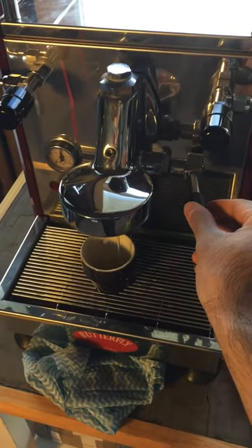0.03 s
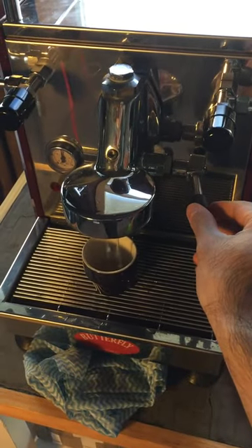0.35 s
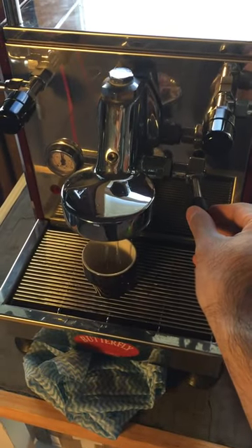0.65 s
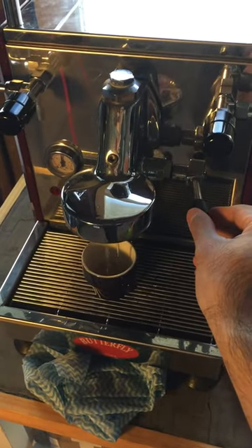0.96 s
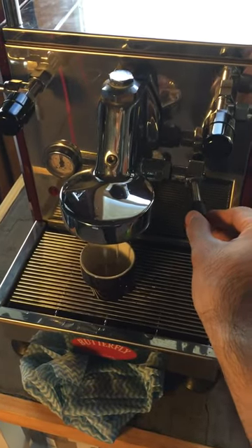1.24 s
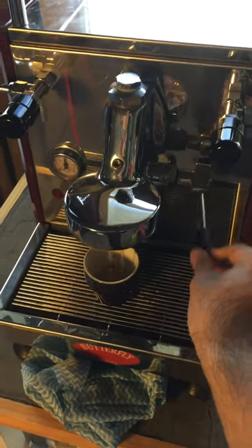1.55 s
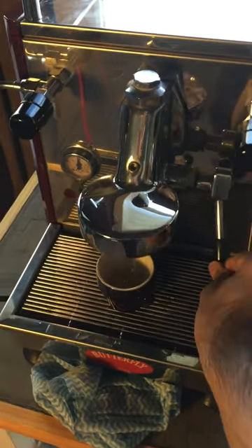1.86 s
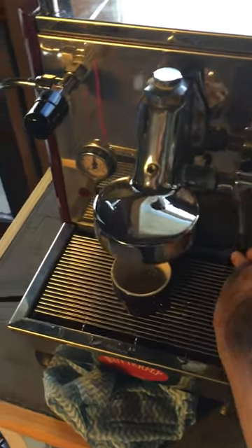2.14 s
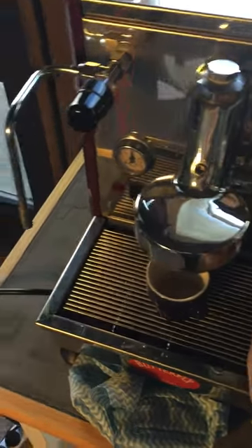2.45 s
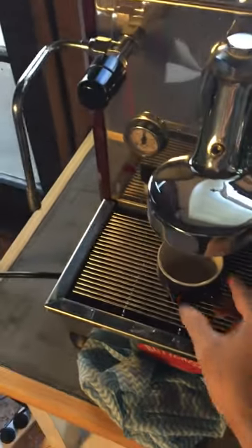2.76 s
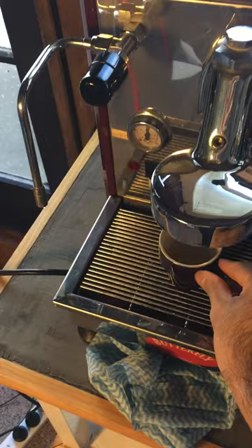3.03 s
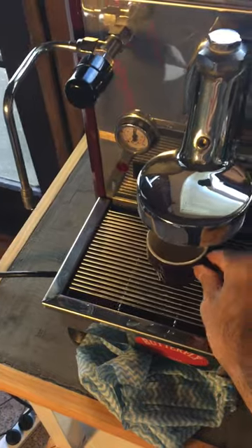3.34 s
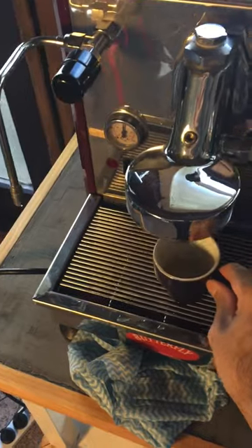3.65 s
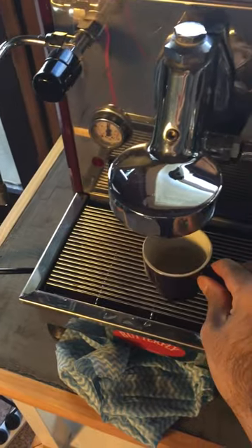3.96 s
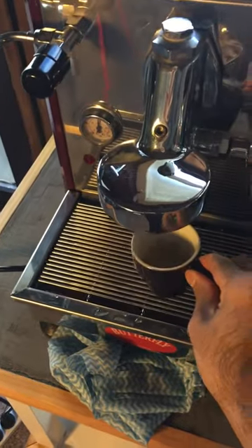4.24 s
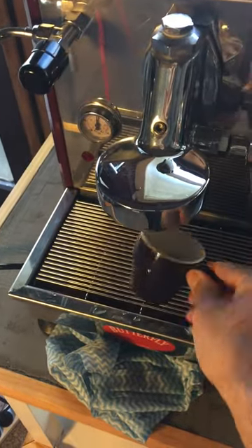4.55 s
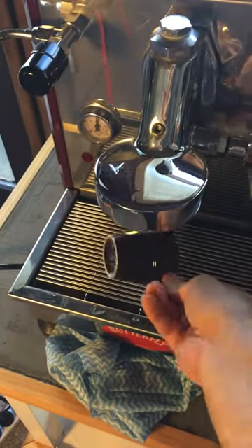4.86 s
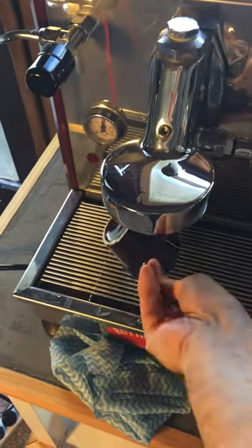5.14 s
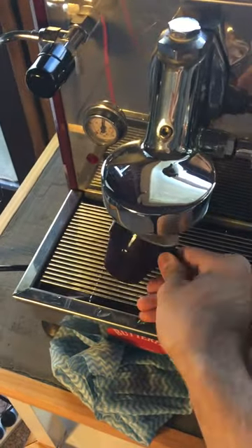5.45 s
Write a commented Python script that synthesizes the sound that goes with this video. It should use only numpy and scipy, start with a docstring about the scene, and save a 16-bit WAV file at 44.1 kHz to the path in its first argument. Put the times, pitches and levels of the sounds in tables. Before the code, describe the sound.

An espresso machine pump buzzes and rattles as water splutters into a cup, then stops, leaving light cup scrapes and clinks.

```python
"""A lever espresso machine's pump drives hot rinse water into a cup in a small kitchen.
The motor drones through the casing; two strokes a turn sound the valve, rattle the panels and spurt
hissing water, which splutters into the cup until the lever shuts the pump off. The boiler keeps a thin
leak whistle and a low rumble. The cup sticks and slips over the drip tray's steel grille, then is
tipped out with light clinks."""
import sys
import numpy as np
from scipy import signal
from scipy.fft import rfft, irfft
from scipy.io import wavfile
from scipy.ndimage import uniform_filter1d

SR = 44100
rng = np.random.default_rng(int(sys.argv[2]) if len(sys.argv) > 2 else 0)


def inscribe(sig):
    """Save sig as 16-bit PCM at rate SR to the path in sys.argv[1].

    A 1-D sig is mono; a 2-D sig holds one channel per row.
    Samples are clipped to [-1, 1] before scaling.
    """
    pcm = np.round(np.clip(np.atleast_2d(sig).T, -1, 1) * 32767)
    wavfile.write(sys.argv[1], SR, pcm.astype(np.int16))


N = 251370

TIME = np.arange(N) / SR
MOTOR_HZ, PUMP_STOP_S = 25.012, 1.787

# Gritty contact on steel. Each row: frequency in Hz, spectral density in dB.
GRIT_SPECTRUM = [(400, 2), (800, 1), (1500, 21.5), (1900, 8), (2500, 8.5), (3300, 14.5), (4000, 3.5),
                 (4700, 5.5), (5900, 8), (7000, -4), (8200, 1.5), (11000, -8.5), (15000, -4)]


def from_db(db):
    """Decibels to gain."""
    return 10 ** (np.asarray(db) / 20)


def rms_one(x):
    """Scale to rms 1."""
    return x / np.sqrt(np.mean(x ** 2) + 1e-20)


def rms_one_pumping(x):
    """Scale to rms 1 over the pump's run."""
    return x / np.sqrt(np.mean(x[TIME < PUMP_STOP_S] ** 2))


def evened(x, window_samples):
    """Hold the slow level at rms 1, keep the quick flutter."""
    return x / np.sqrt(uniform_filter1d(x ** 2, size=window_samples) + 1e-9)


def coloured(x, spectrum):
    """Shape x by (Hz, dB) points, rolled off past both ends; rms 1."""
    hz, db = np.transpose(spectrum)
    bins_hz = np.maximum(np.fft.rfftfreq(N, 1 / SR), 1)
    gain = from_db(np.interp(np.log(bins_hz), np.log(hz), db))
    skirts = np.minimum(bins_hz / hz[0], 1) ** 2 * np.minimum(hz[-1] / bins_hz, 1) ** 2
    return rms_one(irfft(rfft(x) * gain * skirts, N))


def drift(rate_hz):
    """Random wander; rms 1."""
    knots = rng.standard_normal(int(rate_hz * N / SR) + 2)
    return rms_one(np.interp(TIME * rate_hz, np.arange(len(knots)), knots))


def grains(per_s, spread_db):
    """Random impulses of uneven size; rms 1."""
    sizes = from_db(spread_db * np.minimum(rng.exponential(1, N), 4)) * rng.choice([-1, 1], N)
    return rms_one(sizes * (rng.random(N) < per_s / SR))


def resonate(x, hz, width_hz):
    """One resonance, peak gain 1."""
    r = np.exp(-np.pi * width_hz / SR)
    feedback = [1, -2 * r * np.cos(2 * np.pi * hz / SR), r * r]
    return signal.lfilter(np.array([1, 0, -1]) * (1 - r * r) / 2, feedback, x + 1e-18)


def body(x, modes):
    """Parallel resonances, signs alternating."""
    return sum((-1) ** k * from_db(db) * resonate(x, hz, width_hz)
               for k, (hz, width_hz, db) in enumerate(modes))


def narrow_noise(hz, width_hz):
    """Noise in a steep-skirted resonance; rms 1."""
    return rms_one(resonate(resonate(rng.standard_normal(N), hz, width_hz), hz, width_hz))


def add_at_peak(out, start_s, peak_db, sound):
    """Mix in a short sound at a given peak level."""
    at = int(start_s * SR)
    scaled = from_db(peak_db) * sound / np.abs(sound).max()
    out[at:at + len(sound)] += scaled[:max(N - at, 0)]


def swell(start_s, rise_s, hold_s, fall_db_per_s):
    """Envelope: rise, hold, steady fall in dB."""
    since_s = TIME - start_s
    rise = np.clip(since_s / rise_s, 0, 1) ** 1.26
    return rise * from_db(-fall_db_per_s * np.clip(since_s - rise_s - hold_s, 0, 2))


def run_down(db_per_s):
    """Envelope: full until the pump stops, then a steady fall in dB."""
    return from_db(-db_per_s * np.clip(TIME - PUMP_STOP_S, 0, 1))


def strokes(first_s, uneven_db, jitter_s):
    """Two strokes a turn until the stop: seconds from the nearest stroke, and its strength."""
    period_s = 1 / (2 * MOTOR_HZ)
    index = np.round((TIME - first_s) / period_s).astype(int)
    chance = rng.standard_normal((index[-1] + 2, 2))[index]
    stroke_s = first_s + index * period_s
    strength = from_db(uneven_db * chance[:, 1]) * (stroke_s < PUMP_STOP_S)
    return TIME - stroke_s + jitter_s * chance[:, 0], strength


def motor_drone(level_db, waver, shudder, fall_db_per_s, panel_hz, panel_fall_db_per_s):
    """The motor shakes the casing; once off, it shudders out and a panel's note lingers."""
    # Each row: multiple of the turn rate, relative level in dB.
    motor_orders = [(3, -29), (4, -9), (6, -9), (7, 0), (8, -9), (9, -17), (10, -4), (11, -18), (12, -11),
                    (13, -23), (14, -18), (15, -17), (16, -20), (17, -18), (18, -16), (20, -14), (22, -15),
                    (26, -17), (28, -16), (29, -22), (31, -19), (32, -19), (34, -21), (37, -21), (38, -13)]
    out = np.zeros(N)
    coasting = np.clip((TIME - PUMP_STOP_S) / 0.051, 0, 1)
    for order, db in motor_orders:
        hz = order * MOTOR_HZ
        near_panel = np.exp(-(np.log(hz / panel_hz) / .25) ** 2)
        dying = run_down(fall_db_per_s + near_panel * (panel_fall_db_per_s - fall_db_per_s))
        unsteady = waver * np.sqrt(order) + shudder * coasting
        phase = 2 * np.pi * (hz * TIME + rng.random()) + unsteady * drift(24.9)
        tone = (1 + unsteady * drift(25.02)) * np.sin(phase)
        out += from_db(db + level_db - 1.1 * coasting) * tone * dying
    return out


def valve_song(level_db, pitch_hz, swell_s):
    """Each pressure stroke swells a short tone in the valve."""
    since_s, strength = strokes(first_s=.0133, uneven_db=.9, jitter_s=.00005)
    tone = strength * np.exp(-.5 * (since_s / swell_s) ** 2) * np.cos(2 * np.pi * pitch_hz * since_s)
    return from_db(level_db) * rms_one_pumping(tone)


def panel_rattle(level_db, growth_db_per_s, pattern_gain, force_floor, knock_s):
    """Loose panels chatter on every stroke; the bright part nearly repeats."""
    # Each row: frequency in Hz, spectral density in dB.
    panel_spectrum = [(45, -16.5), (130, -11.5), (280, -4), (400, 2), (560, 3.5), (640, -11), (850, -3),
                      (1050, -4), (1230, 0.5), (1750, 0.5), (2300, -9.5), (2900, -12.5), (3600, -17),
                      (4400, -24)]
    since_s, strength = strokes(first_s=0.0092, uneven_db=1.0, jitter_s=0.00017)
    one_stroke = rng.standard_normal(round(SR / MOTOR_HZ / 2))
    stroke_phase = TIME * 2 * MOTOR_HZ % 1
    looped = one_stroke[(stroke_phase * len(one_stroke)).astype(int)]
    pattern = signal.sosfilt(signal.butter(4, 1400, "high", fs=SR, output="sos"), looped)
    contacts = pattern_gain * pattern + grains(per_s=4000, spread_db=2)
    force = force_floor + strength * np.exp(-.5 * (since_s / knock_s) ** 2)
    panels = coloured(contacts * force, panel_spectrum) * run_down(db_per_s=157)
    return from_db(level_db + growth_db_per_s * TIME) * rms_one_pumping(panels)


def water_hiss(level_db, ease_db_per_s, flow_floor, rise_s, fade_s, pipework_db):
    """Water spurts through the valve at every stroke and rings the steel pipework."""
    # Each row: frequency in Hz, spectral density in dB.
    jet_spectrum = [(1500, -21), (3000, -18), (4200, -16), (5000, -8), (6500, 1), (7800, -1), (8600, 1.5),
                    (9700, -1), (10600, -6.5), (13000, -4), (16000, -4)]
    # Each row: frequency in Hz, width in Hz, gain in dB.
    pipework_modes = [(3457, 14, 14.5), (3670, 68, 10), (6470, 240, -13), (7620, 17, 7), (8350, 75, -5),
                      (9650, 65, -11), (13000, 150, -18), (14900, 170, 3), (15500, 110, -8)]
    since_s, strength = strokes(first_s=0.011, uneven_db=0.0, jitter_s=0.00023)
    spurt = strength * np.exp(np.minimum(since_s / rise_s, -since_s / fade_s))
    flow = np.hypot(flow_floor, spurt)
    jet = flow * (grains(per_s=7000, spread_db=4.5) + 1.8 * rng.standard_normal(N))
    jet += 0.073 * grains(per_s=160, spread_db=17.5)   # stray spits
    for hz in np.geomspace(3000, 15000, num=7):   # each spurt gets its own colour
        jet += (from_db(2.0 * drift(50.24)) - 1) * resonate(jet, hz, hz / 5)
    pipework = from_db(pipework_db) * rms_one(body(jet, pipework_modes))
    hiss = (coloured(jet, jet_spectrum) + pipework) * run_down(db_per_s=780)
    return from_db(level_db - ease_db_per_s * TIME) * rms_one_pumping(hiss)


def boiler(flutter_db, surge_db, puff_s):
    """A faint leak whistles unsteadily over a low, surging rumble."""
    # Each row: time in seconds, whistle level in dB, rumble level in dB.
    simmer_levels = [(1.9, -58, -61.5), (2.7, -60.5, -56), (3.1, -59.5, -57.5), (3.65, -58.5, -56.5),
                     (4.05, -61, -66), (5.7, -61, -69)]
    # Each row: frequency in Hz, width in Hz, relative level in dB.
    whistle_modes = [(960, 8.5, -18), (1271, 41, 2.5), (1368, 10, -9), (1752, 41, -16), (1942, 37, -13.5),
                     (2666, 11, -20), (2790, 11, -24)]
    # Spurts of the leak. Each row: time in seconds, whistle level in dB.
    leak_puffs = [(2.585, -58), (5.35, -54)]
    times_s, whistle_db, rumble_db = np.transpose(simmer_levels)
    whistle = sum(from_db(db) * narrow_noise(hz, width_hz) for hz, width_hz, db in whistle_modes)
    puffs = sum(from_db(db) * np.exp(-.5 * ((TIME - at_s) / puff_s) ** 2) for at_s, db in leak_puffs)
    leak = from_db(np.interp(TIME, times_s, whistle_db) + flutter_db * drift(14))
    rumble = narrow_noise(hz=71, width_hz=18.6)
    surge = from_db(np.interp(TIME, times_s, rumble_db) + surge_db * drift(9))
    return np.hypot(leak, puffs) * evened(whistle, 4000) + surge * evened(rumble, 4000)


def kitchen_air(level_db):
    """Steady, bass-heavy room noise."""
    # Each row: frequency in Hz, spectral density in dB.
    air_spectrum = [(25, -14), (50, 4), (110, 5.5), (150, 2.5), (250, 0.5), (400, -5), (600, -10.5),
                    (1200, -8), (2000, -9.5), (3500, -13.5), (4900, -18), (6700, -17), (10500, -25),
                    (16000, -25.5)]
    return from_db(level_db) * coloured(rng.standard_normal(N), air_spectrum)


def splashes(swell_s, width_ratio, small_count, small_db, low_hz, high_hz):
    """Gobs of water hit the cup, each a cluster of bubbles near one pitch; small ones fall at random."""
    # Each row: start in seconds, peak in dB, pitch in Hz.
    large_gobs = [(.168, -29, 1750), (.209, -23.5, 1230), (.308, -27.5, 1710), (.378, -32.5, 646),
                  (.446, -31, 840), (.617, -34.5, 2900), (.731, -28, 770), (.74, -34.5, 3400),
                  (0.963, -27, 1510), (.991, -30.5, 2950), (1.234, -24.5, 1470), (1.533, -27.5, 1640),
                  (1.659, -27, 1910)]
    small_gobs = [(when * PUMP_STOP_S, small_db, low_hz * (high_hz / low_hz) ** pitch)
                  for when, pitch in rng.random((small_count, 2))]
    out, t = np.zeros(N), TIME[:SR // 15]
    for start_s, peak_db, hz in large_gobs + small_gobs:
        burst = rng.standard_normal(len(t)) * t * np.exp(-t / swell_s)
        plop = resonate(burst, hz, hz * width_ratio)
        add_at_peak(out, start_s, peak_db, resonate(plop, hz, hz / 2))
    return out


def spout_spits(burst_s):
    """Air caught in the water bursts out in short bright ticks."""
    # Each row: start in seconds, peak in dB.
    spit_events = [(0.742, -32), (0.846, -35), (1.161, -33), (1.3334, -27), (1.7642, -25.5)]
    out, t = np.zeros(N), TIME[:SR // 100]
    for start_s, peak_db in spit_events:
        burst = rng.standard_normal(len(t)) * np.exp(-t / burst_s)
        add_at_peak(out, start_s, peak_db, resonate(burst, hz=10800, width_hz=9000))
    return out


def lever_and_cup_clicks(contact_s, width_hz, cup_gain):
    """Brief rough contacts, each a note and a bright crack; the cup rings along."""
    # Each row: start in seconds, peak in dB, pitch in Hz, crack relative to the note in dB.
    click_events = [(1.802, -36, 2870, -26), (1.89, -35.5, 2010, -11.5), (3.1014, -33.5, 3030, -35),
                    (3.4563, -49, 4560, -23), (3.55, -39.5, 3300, -24), (4.875, -45, 2780, -26),
                    (4.8893, -43, 3060, -18), (4.8945, -38.5, 6860, -30), (4.936, -41.5, 6200, -4),
                    (4.971, -47, 2910, -7), (5.0023, -46, 2040, -7), (5.021, -51, 3740, -17),
                    (5.0375, -36, 3340, -7), (5.0443, -34.5, 3940, -24), (5.055, -40.5, 6280, -27),
                    (5.1168, -48, 2700, -30), (5.18, -47, 4300, -12)]
    # Each row: frequency in Hz, width in Hz, gain in dB.
    cup_modes = [(2798, 20, 5), (3350, 8.9, 2), (4100, 49, -16), (4120, 23, -24), (4440, 110, -9),
                 (6240, 33, -8)]
    out, t = np.zeros(N), TIME[:SR // 15]
    for start_s, peak_db, hz, crack_db in click_events:
        contact = rng.standard_normal(len(t)) * np.exp(-t / contact_s)
        ringing = resonate(contact, hz, width_hz) + cup_gain * body(contact, cup_modes)
        note = rms_one(resonate(ringing, hz, hz / 2))
        crack = rms_one(resonate(contact, hz=13200, width_hz=4000))
        add_at_peak(out, start_s, peak_db, note + from_db(crack_db) * crack)
    return out


def grille_taps(contact_s, pitch_hz):
    """A soft, rubbing touch rings one wire of the grille."""
    # Each row: start in seconds, peak in dB.
    tap_events = [(2.118, -49), (4.156, -51.5)]
    out, t = np.zeros(N), TIME[:SR // 5]
    for start_s, peak_db in tap_events:
        touch = rng.standard_normal(len(t)) * t * np.exp(-t / contact_s)
        wire = resonate(touch, pitch_hz, width_hz=25)
        add_at_peak(out, start_s, peak_db, resonate(wire, pitch_hz, width_hz=300))
    return out


def casing_bumps(swell_s):
    """The casing answers a soft push with a short low note."""
    # Each row: start in seconds, peak in dB, pitch in Hz.
    bump_events = [(2.243, -46.5, 170), (4.165, -57.5, 165)]
    out, t = np.zeros(N), TIME[:SR // 4]
    for start_s, peak_db, hz in bump_events:
        add_at_peak(out, start_s, peak_db, t * np.exp(-t / swell_s) * np.sin(2 * np.pi * hz * t))
    return out


def hand_brush(start_s, level_db):
    """A hand brushes the steel: one short sweep of fine grains."""
    sweep = swell(start_s, rise_s=.02, hold_s=.01, fall_db_per_s=130)
    return from_db(level_db) * sweep * coloured(grains(per_s=6700, spread_db=1), GRIT_SPECTRUM)


def shoved(shoves, levels_db, fall_db_per_s, lag_s=0):
    """One part's envelope: each shove drives it up, then it decays at its own rate."""
    return np.max([from_db(db) * swell(start_s + lag_s, rise_s, hold_s, fall_db_per_s)
                   for (start_s, rise_s, hold_s, *_), db in zip(shoves, levels_db)], axis=0)


def cup_drag():
    """The cup's foot sticks and slips: the tray booms, the glaze grits, the rubbed wires sing."""
    # Each row: start, rise and hold in seconds, then tray, grit and wire levels in dB.
    shoves = [(2.94, 0.026, 0.074, -41.5, -55.5, -58), (3.075, 0.025, 0.007, -37.5, -55.5, -55),
              (3.276, 0.035, 0.017, -49.5, -64, -63.5), (3.434, 0.12, 0.039, -41.5, -53, -52),
              (4.972, 0.012, 0.0035, -60.5, -68, -72)]
    # Drip tray. Each row: frequency in Hz, width in Hz, gain in dB.
    tray_modes = [(156, 37, -12), (244, 22, -5), (313, 16.4, -2), (439, 33, 2.5), (483, 63, 2),
                  (546, 34, -0.5), (586, 70, -6.5), (665, 56, -3), (736, 110, -11), (970, 25, -9),
                  (1253, 125, -9), (1355, 120, -12), (1540, 53, -16.5)]
    # Grille under the glaze. Each row: frequency in Hz, width in Hz, gain in dB.
    grit_modes = [(2200, 50, -8), (3400, 23, -9), (4600, 100, -5), (4760, 30, 1), (5530, 84, -3),
                  (6000, 87, -12), (5980, 54, 0), (6400, 41, -1), (7000, 54, -5), (7800, 41, -12),
                  (9800, 110, -15)]
    # Grille wires. Each row: frequency in Hz, width in Hz, relative level in dB.
    wire_modes = [(2692, 35, -1), (2870, 72, 10), (2870, 17, -0.5), (3006, 43, -21)]
    *_, tray_db, grit_db, wires_db = np.transpose(shoves)
    chatter = from_db(2.3 * drift(110))   # the foot catches on wire after wire
    tray = body(chatter * grains(per_s=1100, spread_db=3), tray_modes)
    tray = signal.sosfilt(signal.butter(2, 2000, fs=SR, output="sos"), tray)
    slips = chatter * grains(per_s=2800, spread_db=-0.5)
    grit = from_db(2.5) * coloured(slips, GRIT_SPECTRUM)
    grit += from_db(-4) * rms_one(body(slips, grit_modes))
    wires = sum(from_db(db) * narrow_noise(hz, width_hz) for hz, width_hz, db in wire_modes)
    return (evened(tray, 2500) * shoved(shoves, tray_db, fall_db_per_s=140)
            + grit * shoved(shoves, grit_db, fall_db_per_s=207)
            + evened(wires, 2500) * shoved(shoves, wires_db, fall_db_per_s=48, lag_s=0.015))


def droplets(per_s, q, tilt_db_per_octave):
    """Tiny drops burst at random and ring briefly; rms 1."""
    pitches_hz = np.geomspace(2700, 14500, num=14)
    out = np.zeros(N)
    for hz in pitches_hz:
        drops = resonate(grains(per_s / len(pitches_hz), spread_db=8), hz, hz / q)
        gain = from_db(tilt_db_per_octave * np.log2(hz / pitches_hz[0]))
        out += gain * rms_one(resonate(drops, hz, hz / 4))
    return rms_one(out)


def cup_spill(start_s, boom_peak_s, level_db):
    """The tipped cup empties in one pour: water patters into the tray, which booms faintly."""
    wash = grains(per_s=14000, spread_db=7)
    boom = rms_one(resonate(wash, hz=530, width_hz=34)) * from_db(-60 * np.abs(TIME - boom_peak_s))
    drops = droplets(per_s=1400, q=19, tilt_db_per_octave=-2.0)
    patter = 0.37 * drops + 0.94 * coloured(wash, GRIT_SPECTRUM) + 0.4 * boom
    return from_db(level_db) * swell(start_s, rise_s=.16, hold_s=.1, fall_db_per_s=190) * patter


def kitchen_reverb(x, t60_s, treble_t60_s, wet_db):
    """Add a diffuse tail that dies sooner in the treble."""
    t = TIME[:SR // 2]
    noise = rng.standard_normal(len(t)) * (t > .004)
    low = signal.sosfilt(signal.butter(2, 1800, fs=SR, output="sos"), noise)
    high = signal.sosfilt(signal.butter(2, 1800, "high", fs=SR, output="sos"), noise)
    tail = low * np.exp(-np.log(1000) * t / t60_s) + high * np.exp(-np.log(1000) * t / treble_t60_s)
    return x + from_db(wet_db) * signal.fftconvolve(x, tail / np.sqrt(np.sum(tail ** 2)))[:N]


def scene():
    """Mono mix: handling, water and pump noise with reverb; tones, bumps, boiler and air dry."""
    handling = cup_drag() + hand_brush(start_s=2.545, level_db=-60.5)
    handling += cup_spill(start_s=4.83, boom_peak_s=5.0, level_db=-58.5)
    handling += grille_taps(contact_s=.003, pitch_hz=2900)
    handling += lever_and_cup_clicks(contact_s=.0018, width_hz=400, cup_gain=1.8)
    water = splashes(swell_s=.0022, width_ratio=.1, small_count=5, small_db=-35,
                     low_hz=1440, high_hz=3200)
    water += spout_spits(burst_s=.0012)
    panels = panel_rattle(level_db=-38, growth_db_per_s=.5, pattern_gain=.6, force_floor=.78,
                          knock_s=.0026)
    hiss = water_hiss(level_db=-46.5, ease_db_per_s=1.8, flow_floor=.28, rise_s=.003, fade_s=.008,
                      pipework_db=-7)
    mix = kitchen_reverb(panels + hiss + water + handling, t60_s=.32, treble_t60_s=.15, wet_db=-8.5)
    mix += motor_drone(level_db=-34.5, waver=.048, shudder=.71, fall_db_per_s=141,
                       panel_hz=290, panel_fall_db_per_s=66)
    mix += valve_song(level_db=-35.4, pitch_hz=1256, swell_s=.0032)
    mix += kitchen_air(level_db=-63)
    mix += boiler(flutter_db=3, surge_db=2.5, puff_s=.016)
    mix += casing_bumps(swell_s=.013)
    return mix[None]


def record(dry):
    """Steep low-pass at 15950 Hz."""
    return signal.sosfilt(signal.ellip(12, .1, 80, 15950, fs=SR, output="sos"), dry)


dry = scene()
out = record(dry)
inscribe(out)
```